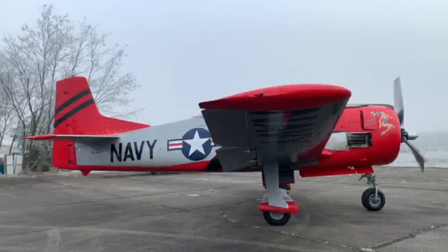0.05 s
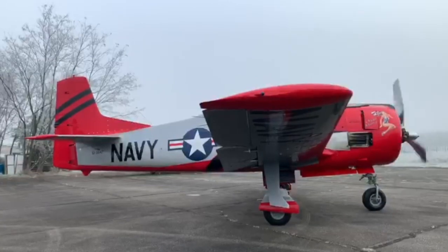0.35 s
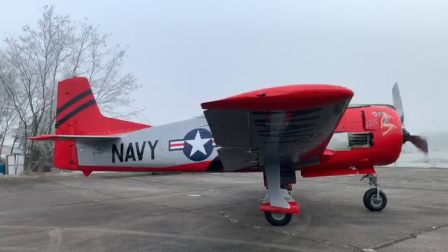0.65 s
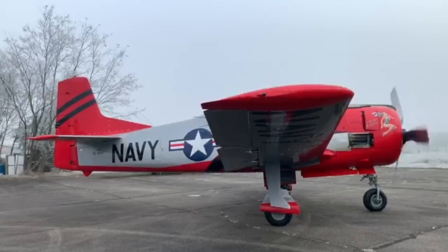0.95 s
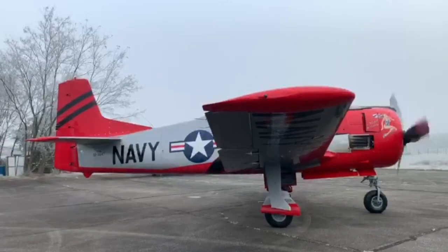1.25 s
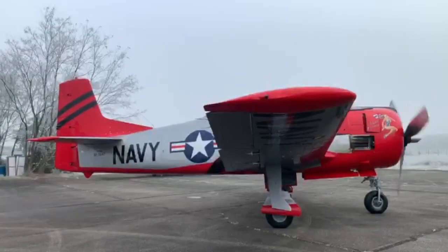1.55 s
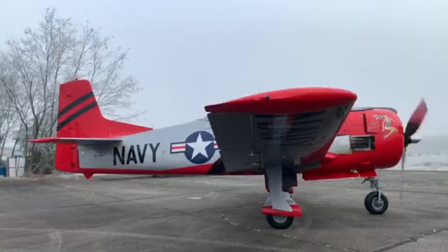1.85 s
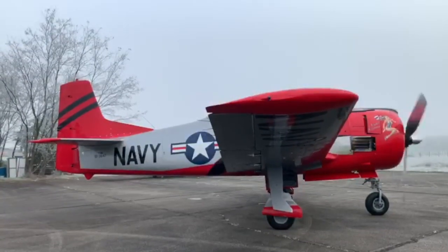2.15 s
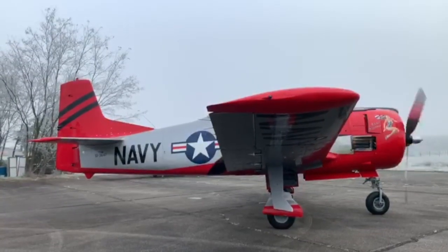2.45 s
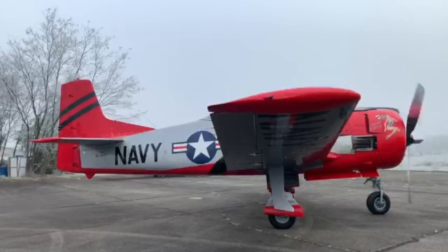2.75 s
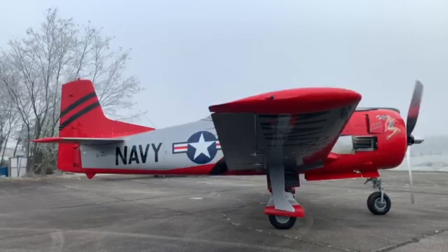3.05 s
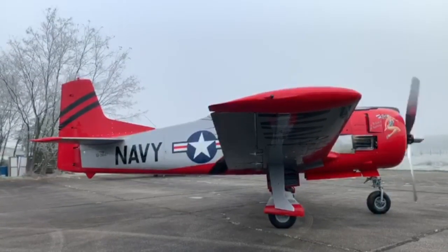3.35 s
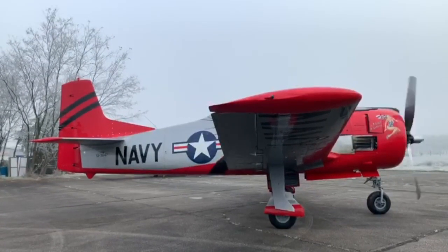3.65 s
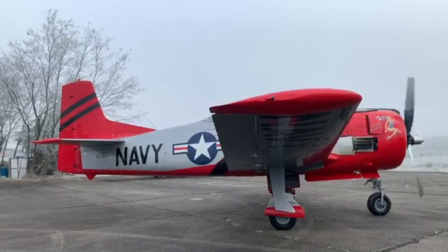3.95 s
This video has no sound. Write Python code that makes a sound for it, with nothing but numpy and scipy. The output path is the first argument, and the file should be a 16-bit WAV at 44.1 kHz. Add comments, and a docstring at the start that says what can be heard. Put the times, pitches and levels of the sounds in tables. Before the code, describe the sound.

A propeller aircraft engine idles with a low rumble and rapid chugging pulses.

```python
"""Open apron, a two-port microphone off to one side of an idling nine-cylinder radial aircraft engine.
From the start the propeller churns the air, the cowling drones and each firing thumps in its own stack.
The stacks facing the microphone also spit gas: every two turns, three barks, then two, then a low note
rolling upward. The whole sound swells by 10 dB over the first 1.3 s. From about 0.7 s a stack now and
then rings out hollow, and the idle holds near 1093 turns a minute to the end."""
import sys
import numpy as np
from scipy import signal
from scipy.fft import rfft, irfft
from scipy.io import wavfile
from scipy.ndimage import uniform_filter1d

SR = 44100
rng = np.random.default_rng(int(sys.argv[2]) if len(sys.argv) > 2 else 0)


def to_wav(sig):
    """Store sig (one row per channel, or 1-D mono) as 16-bit WAV at the path in sys.argv[1].

    Samples outside -1..1 are clipped; the rate is SR.
    """
    pcm = np.clip(np.atleast_2d(sig), -1, 1) * 32767
    pcm = np.round(pcm).astype(np.int16)
    wavfile.write(sys.argv[1], SR, pcm.T)  # frames by channels


N = 176400


def undb(db):
    """Decibels to gain."""
    return 10 ** (np.asarray(db) / 20)


def level(x, db):
    """Scale to an rms level."""
    return x * undb(db) / np.sqrt(np.mean(x ** 2))


def freqs():
    """Frequency of every spectral bin."""
    return np.maximum(np.arange(N // 2 + 1) * SR / N, 1)


def over_hz(table):
    """Read an (f/Hz, value) table on a log-frequency axis."""
    hz, value = np.array(table, float).T
    return np.interp(np.log(freqs()), np.log(np.maximum(hz, 1)), value)


def two_pole(hz, q, zeros=0):
    """Two-pole response: 0 zeros give a low-pass, 1 a band-pass, 2 a high-pass."""
    s = 1j * freqs() / hz
    return s ** zeros / (1 + s / q + s * s)


def share_above(hz):
    """Share of the power that a steep crossover passes upward."""
    return 1 - 1 / (1 + (freqs() / hz) ** 6)


def waver(per_s):
    """Random wavering of unit rms."""
    hold = int(SR / per_s)
    steps = np.repeat(rng.standard_normal(N // hold + 1), hold)
    return level(uniform_filter1d(steps, hold)[:N], 0)


# At the microphone, left port against right: f/Hz, phase lead/rad
MIC_PHASE = [(0, 1), (780, -0.9), (1460, -0.5), (1810, -0.9), (2070, -0.1), (3620, 0.25), (5510, -2.7),
             (6370, -0.5), (6720, -0.6), (7670, -2.9), (9220, -3.3), (9560, -4.2), (10300, -6.3),
             (12300, -6.3)]
# f/Hz, left minus right level/dB
MIC_BALANCE = [(200, -1), (350, -1), (630, -4.5), (1140, -4), (2060, 1.5), (3720, -3), (6710, -3),
               (12000, 1)]
# f/Hz, coherence (0-1)
MIC_COHERENCE = [(100, 0.97), (270, 0.7), (600, 0.89), (1250, 0.54), (2500, 1), (4500, 0.53), (7000, 0.8),
                 (11000, 0.96)]

def noise_at_mic(a, b):
    """Two unrelated noise spectra become partly alike left and right; their mean keeps its colour."""
    coherence, lead = over_hz(MIC_COHERENCE), over_hz(MIC_PHASE)
    balance = undb(over_hz(MIC_BALANCE))
    right = coherence * np.exp(-1j * lead) * a + np.sqrt(1 - coherence ** 2) * b
    mean_gain = np.sqrt(1 + balance ** 2 + 2 * balance * coherence * np.cos(lead)) / 2
    return irfft(np.array([balance * a, right]) / mean_gain, N)


def tone_at_mic(x):
    """A tone reaches the two ports with a difference in level and phase."""
    left = undb(over_hz(MIC_BALANCE)) * np.exp(1j * over_hz(MIC_PHASE))
    ports = np.array([left, np.ones_like(left)])
    return irfft(rfft(x) * ports * 2 / (1 + np.abs(left)), N)


# Propeller wash at the microphone: f/Hz, relative level/dB
WASH_SPECTRUM = [(15, -10), (30, 5), (60, -11.5), (120, -9), (200, 9), (330, -10), (600, -14), (2000, -41)]

def propeller_wash():
    """Behind everything, the low rumble of air churned by the propeller."""
    rumble = rfft(rng.standard_normal((2, N))) * undb(over_hz(WASH_SPECTRUM))
    return level(noise_at_mic(*rumble), db=-35)


# Cowling tones: multiple of the cycle rate (played rounded), relative level/dB at the start, at the end
COWLING_TONES = [(25, -50, -45.5), (26, -41.5, -43), (27, -45, -51), (28, -40.5, -50), (32, -41, -43),
                 (33, -41.5, -50), (36, -48, -54), (37, -46, -50), (40, -53, -50), (42, -44.5, -48),
                 (43, -48, -39.5), (56, -53, -55), (59, -49.5, -41.5), (60, -52, -50), (61, -43, -44),
                 (75, -60, -42), (76.3, -63, -47), (84.6, -62, -43.5)]

def cowling_drone(cycles, waver_db=1):
    """The cowling hums at whole multiples of the cycle rate; some tones grow, others fade."""
    out = np.zeros(N)
    for multiple, start_db, end_db in COWLING_TONES:
        gain = undb(np.linspace(start_db, end_db, N) + waver_db * waver(per_s=13))
        out += gain * np.sin(2 * np.pi * (round(multiple) * cycles + rng.random()))
    return np.sqrt(2) * undb(-1) * out


# Stacks ringing out over the idle: t/s, f/Hz, relative level/dB
HOLLOW_NOTES = [(0.669, 1088, -31), (0.897, 1125, -30), (0.963, 577, -28.5), (1.106, 710, -28),
                (1.108, 1084, -31), (1.29, 565, -31), (1.324, 727, -32), (1.44, 1127, -35),
                (1.723, 552, -30), (1.833, 530, -30), (1.899, 1292, -35), (2.01, 578, -30),
                (2.176, 570, -32), (2.384, 603, -30), (2.421, 741, -26.5), (2.441, 1109, -28.5),
                (2.719, 593, -25.5), (2.779, 1144, -30), (2.817, 531, -33), (3.301, 720, -32),
                (3.327, 1300, -32), (3.411, 1096, -33), (3.589, 498, -27), (3.707, 605, -42)]

def hollow_stacks(attack_s=.011, decay_s=.014):
    """Brief hollow notes of the stacks, built up by the gas and soon damped."""
    out = np.zeros(N)
    for when, hz, db in HOLLOW_NOTES:
        age = np.maximum(np.arange(N) / SR - when, 0)
        envelope = (1 - np.exp(-(age / attack_s) ** 2)) * np.exp(-age / decay_s)
        out += undb(db) * envelope / envelope.max() * np.sin(2 * np.pi * (hz * age + rng.random()))
    return np.sqrt(2) * undb(-1) * out


def pulses(times, db, scatter_db):
    """One pulse a firing, each of a slightly different strength."""
    gains = undb(db + scatter_db * rng.standard_normal(times.shape))
    return np.bincount(np.maximum(times * SR, 0).astype(int), gains, N)[:N]


def rising_roll(times, from_hz=125, hz_per_s=2504, length_s=.061):
    """From the last firing of each cycle a low note swells and glides upward through the barks."""
    age = np.arange(int(length_s * SR)) / SR
    glide = np.sin(2 * np.pi * (from_hz + hz_per_s * age / 2) * age)
    note = np.sin(np.pi * age / length_s) * glide
    onsets = pulses(times[:, -1], db=0, scatter_db=2.5)
    return level(signal.fftconvolve(onsets, note)[:N], db=-33.5)


# Each stack from the microphone's side, in firing order; arrivals within the cycle, levels relative:
# thump t/ms, thump level/dB, stack f/Hz, gas t/ms, bark level/dB, hiss level/dB
STACKS = [(4.4, -12.5, 116.5, 4.3, 3, 2.5), (15.16, 1.5, 69.46, 15.2, 4, 2),
          (33.61, -9, 110.3, 31.8, 3.5, -2.5), (36.6, -14.5, 232, 39.5, -5.5, -18),
          (46.26, -16, 153, 46.2, -14, -20), (63.3, -28, 102.4, 63.6, -1.5, -0.5),
          (74.84, -4, 69.4, 77, 2, -1.5), (89.2, -6.5, 70.3, 85.5, -10.5, -19),
          (96.6, -3.5, 80.7, 110, -27, -42)]

def stack_thumps(times):
    """Each firing's pulse rings its stack; little deep bass comes through."""
    spectrum = 0
    for arrivals, (_, db, hz, *_) in zip(times.T, STACKS):
        spectrum += rfft(pulses(arrivals, db, scatter_db=.5)) * two_pole(hz, q=7.74, zeros=1)
    bass_cut = two_pole(hz=80.8, q=1.21, zeros=2)
    top_cut = two_pole(hz=210, q=np.sqrt(.5))
    return level(irfft(spectrum * bass_cut * top_cut, N), db=-20.5)


def thump_times(cycles, first_cycle_s=.0087, jitter_ms=.12):
    """When each thump reaches the microphone, t/s: one row a cycle, one column a cylinder."""
    starts = first_cycle_s + np.interp(np.arange(int(cycles[-1]) + 1), cycles, np.arange(N) / SR)
    arrival_ms = np.array(STACKS)[:, 0] + jitter_ms * rng.standard_normal((len(starts), len(STACKS)))
    return starts[:, None] + arrival_ms / 1000


# Firings that bark harder or falter: t/s, change in level/dB
FIRING_ACCENTS = [(0.074, 3.0), (0.123, -2.5), (0.183, -4.5), (0.197, 2.5), (0.293, 2), (0.512, -2.5),
                  (0.683, -1.5), (1.061, 3.5), (1.075, -19), (1.122, 3.5), (1.281, 3.5), (1.331, -1.5),
                  (1.359, 3.5), (1.452, 3), (1.469, -2.5), (1.578, -1), (1.771, -0.5), (1.782, 3),
                  (1.892, 3), (1.941, 4), (1.991, 3), (2.1, 3.5), (2.174, 2.5), (2.27, 3.5), (2.503, 1.5),
                  (2.722, -2), (2.758, 2.0), (2.928, 2.0), (2.978, 0.5), (3.005, 2.5), (3.197, -1),
                  (3.428, 3), (3.477, -2.5), (3.538, 1.5), (3.806, -1), (3.82, 1.5)]

def firing_strength(times, scatter_db=1.22):
    """Each firing's change in dB: left to chance, except for the one nearest each accent."""
    db = scatter_db * rng.standard_normal(times.shape)
    for when, change_db in FIRING_ACCENTS:
        db.flat[np.argmin(np.abs(times - when))] = change_db
    return db


def stack_mouths(count, size=2048, echo=.31, patch_db=3.5, patch_hz=260, patchy_from_hz=900):
    """Each burst rings the stack's mouth in its own colour, at a pitch varying with the gas's heat."""
    hz = np.arange(size // 2 + 1) * SR / size
    mouth_hz = 563.3 * np.exp(.06 * rng.standard_normal((count, 1)))
    knots = rng.standard_normal((count, size // 20))
    patches = np.array([np.interp(hz / patch_hz, np.arange(len(row)), row) for row in knots])
    colour = undb(patch_db * patches * hz / (hz + patchy_from_hz))
    response = colour / (1 - echo * np.exp(-2j * np.pi * hz / mouth_hz))
    return response / np.sqrt(np.mean(np.abs(response) ** 2, axis=1, keepdims=True))


def gas_jet(times, db, mouths, attack_s, decay_s, tail_db, tail_s, steady_db, crackle_db):
    """Crackling bursts with a short tail off wing and ground, over steady clatter; two noise spectra."""
    size = 2 * (mouths.shape[1] - 1)
    t = np.arange(size) / SR
    past_peak = np.maximum(t - attack_s, 0)
    tail = undb(tail_db) * np.exp(-past_peak / tail_s)
    envelope = np.minimum(t / attack_s, 1) * (np.exp(-past_peak / decay_s) + tail)
    bursts = rng.standard_normal((times.size, 2, size)) * envelope
    puffs = irfft(rfft(bursts) * mouths[:, None])
    starts = np.clip(times.ravel() * SR, 0, N).astype(int)
    train = np.zeros((2, N + size))
    for start, gain, puff in zip(starts, undb(db).ravel(), puffs):
        train[:, start:start + size] += gain * puff
    crackling = level(train[:, :N] * undb(crackle_db * waver(per_s=2500)), 0)
    clatter = undb(steady_db) * rng.standard_normal((2, N))
    return rfft(level(crackling + clatter, 0))


# Exhaust gas at the microphone: f/Hz, relative level/dB
GAS_SPECTRUM = [(180, -58), (300, 8), (319, 5.5), (361, -6), (384, -3.5), (414, -2), (572, -2), (647, -4),
                (709, -3), (827, -8), (1010, -8.5), (1120, -4.5), (1440, -10), (1700, -4.5), (1930, -8),
                (2390, -5.5), (2740, -10), (3010, -7.5), (4770, -14), (7110, -10.5), (8290, -24.5),
                (9660, -12), (10400, -9), (11300, -11), (11800, -21.5), (15300, -50), (22000, -120)]

def exhaust_barks(times, chuff_share=.31):
    """Escaping gas gives a low chuff, a bark and a sharp hiss, loudest from the near stacks."""
    thump_ms, _, _, gas_ms, bark_db, hiss_db = np.array(STACKS).T
    arrivals = times + (gas_ms - thump_ms) / 1000
    change_db = firing_strength(arrivals)
    mouths = stack_mouths(arrivals.size)
    # each burst starts to build just ahead of its arrival time
    chuff = gas_jet(arrivals - .000996, bark_db + chuff_share * change_db, mouths, attack_s=.0046,
                    decay_s=.0105, tail_db=-12, tail_s=.02, steady_db=-1.5, crackle_db=.5)
    bark = gas_jet(arrivals - .003, bark_db + change_db, mouths, attack_s=.0056,
                   decay_s=.0042, tail_db=-11.5, tail_s=.021, steady_db=-9, crackle_db=1.6)
    hiss = gas_jet(arrivals - .0034, hiss_db + change_db, mouths, attack_s=.0064,
                   decay_s=.0032, tail_db=-9.5, tail_s=.021, steady_db=-13, crackle_db=2)
    low, mid, high = share_above(hz=376), share_above(hz=1730), share_above(hz=4570)
    mix = chuff * np.sqrt(low * (1 - mid)) + bark * np.sqrt(mid * (1 - high)) + hiss * np.sqrt(high)
    stereo = noise_at_mic(*(mix * undb(over_hz(GAS_SPECTRUM))))
    return stereo * undb(-25.5) / stereo.mean(axis=0).std()


# Crank at idle: t/s, speed/rpm
CRANK_RPM = [(0, 1094.2), (.5, 1093.8), (1.0, 1091.8), (1.8, 1091.6), (2.1, 1094), (2.8, 1094.8),
             (3.2, 1093), (3.55, 1091.2), (4, 1095)]
# Opening swell of the whole sound: t/s, level/dB
OVERALL_SWELL = [(0, -10), (.25, -8.5), (.5, -6.5), (.75, -3), (1.0, -2), (1.3, 0), (2.5, 0.07), (4, 0)]

def scene():
    """The engine from one side of the apron; the crank paces firings and drone, two turns a cycle."""
    t = np.arange(N) / SR
    rpm = np.interp(t, *np.array(CRANK_RPM).T)
    cycles = np.cumsum(rpm) / (2 * 60 * SR)
    times = thump_times(cycles)
    low_beat = stack_thumps(times) + rising_roll(times)
    tones = tone_at_mic(cowling_drone(cycles) + hollow_stacks())
    swell = undb(np.interp(t, *np.array(OVERALL_SWELL).T))
    return (low_beat + tones + exhaust_barks(times) + propeller_wash()) * swell


def record(dry):
    """The recorder behind the microphone cuts the top steeply."""
    top_hz = 11750
    return signal.sosfilt(signal.ellip(10, .2, 80, top_hz, fs=SR, output="sos"), dry)


dry = scene()
out = record(dry)
to_wav(out)
```